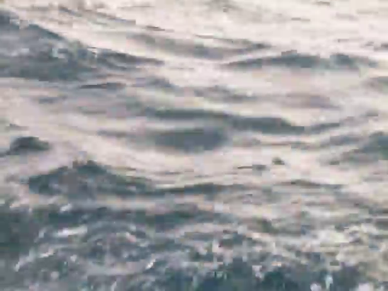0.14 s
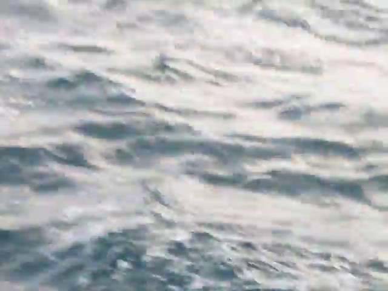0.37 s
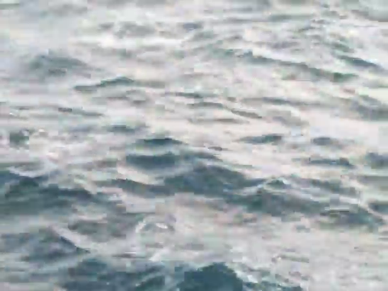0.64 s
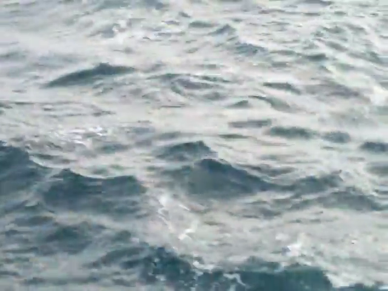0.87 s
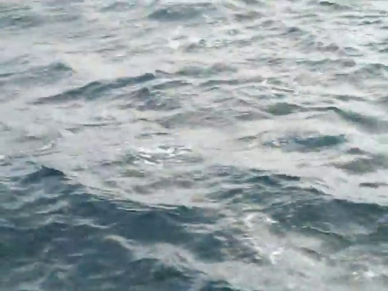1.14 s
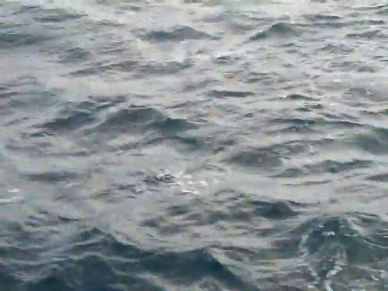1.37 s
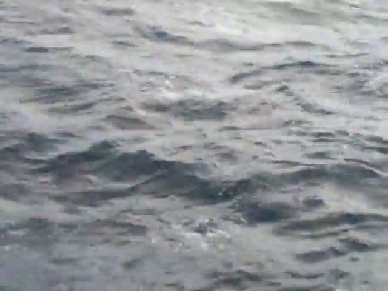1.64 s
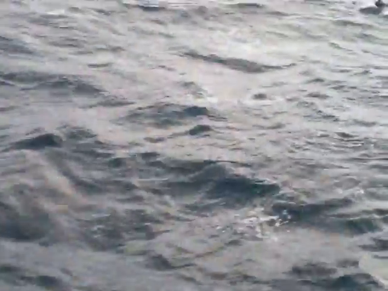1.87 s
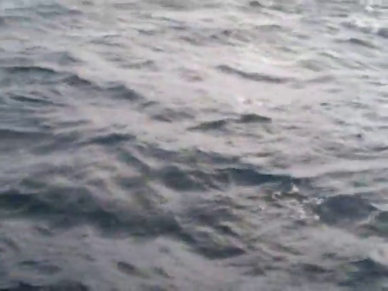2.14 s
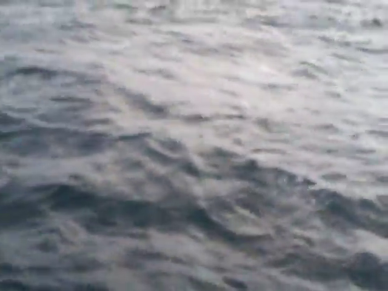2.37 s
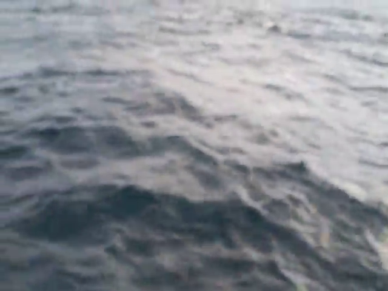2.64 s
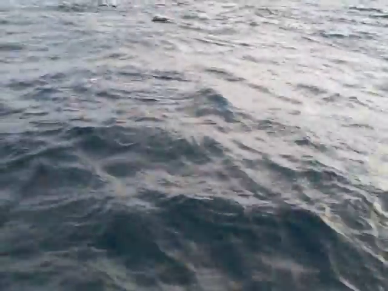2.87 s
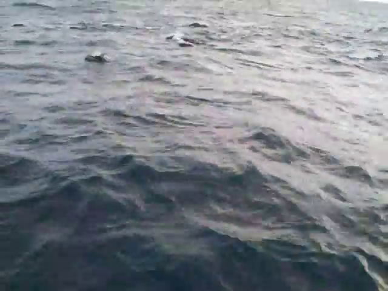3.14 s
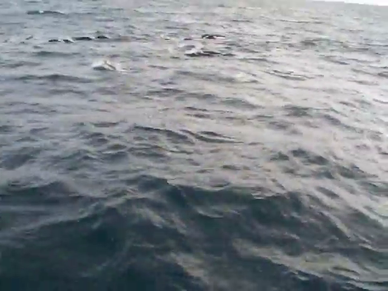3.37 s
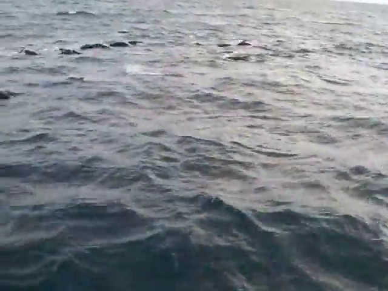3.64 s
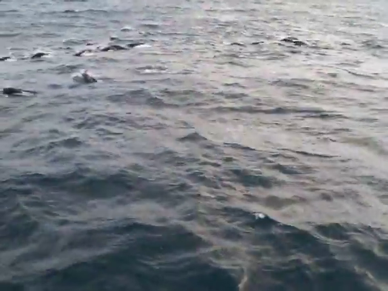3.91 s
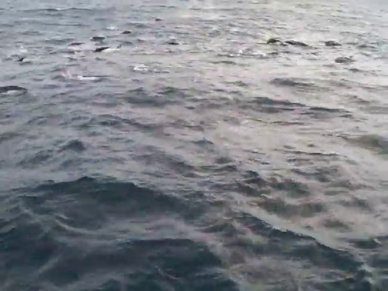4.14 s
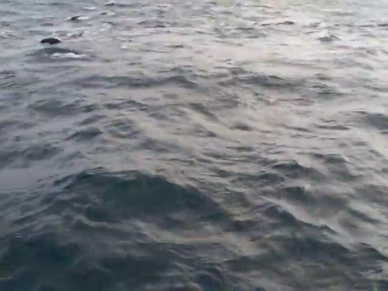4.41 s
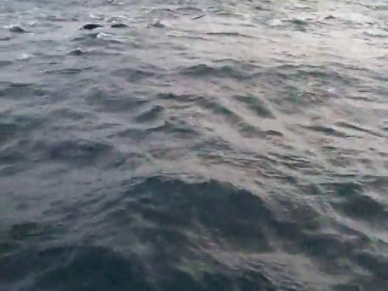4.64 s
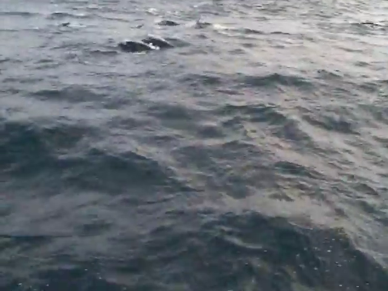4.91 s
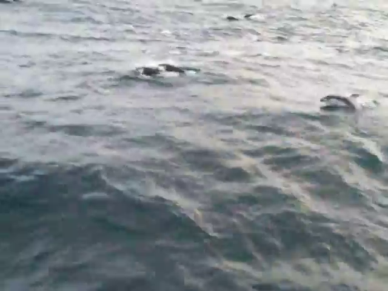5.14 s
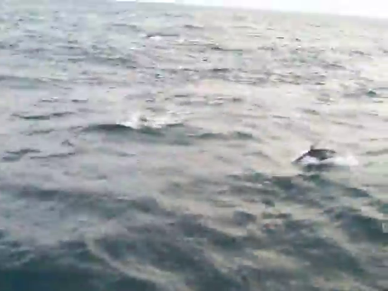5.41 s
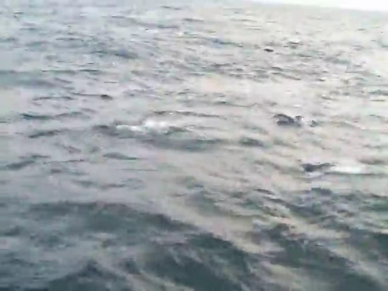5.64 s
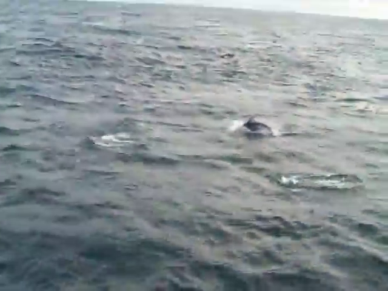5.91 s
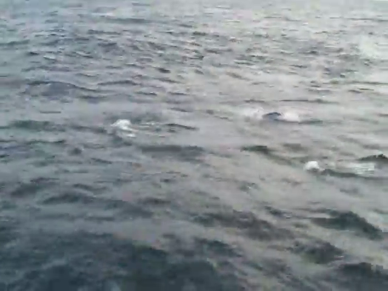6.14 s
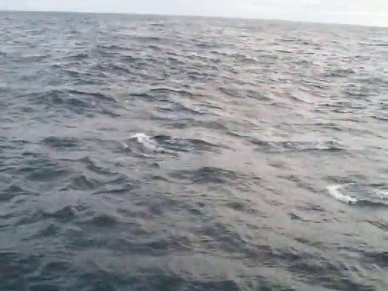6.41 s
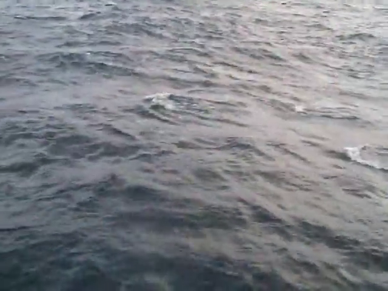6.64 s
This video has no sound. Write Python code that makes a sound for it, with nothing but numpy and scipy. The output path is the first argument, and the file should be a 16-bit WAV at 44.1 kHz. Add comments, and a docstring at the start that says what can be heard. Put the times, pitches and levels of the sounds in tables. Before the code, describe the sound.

About 0.2 s of silence, then the sound cuts in abruptly with a dull thump. A low engine drone with a noisy roar lies under fluttering wind rumble, close on a small, unshielded microphone on a boat deck. Until 0.8 s a thin, high lens motor whine buzzes in very fast steps, and the highs are muffled. At 0.9 s the sound opens: fizzing hull wash and smooth far-sea hiss, with a few wind pops. From 1.6 to 2.6 s it dulls again, with a fainter stepped whine from 1.7 to 2.5 s. Then it stays clear. A bright spray tick lands near 2.75 s, others around 4.05 and 4.4 s. From 3 s gust pops, knocks and crackles crowd in, densest around 5 to 5.3 s, while the wash surges, notably near 5.2 s. They thin near 6 s, then another cluster arrives around 6.5 s; wind, engines and water continue to the end.

```python
"""On the deck of a boat at sea: wind buffets the bare microphone of a small camera over the drone of engines.
After a short silence the sound cuts in with a thump, and the lens motor whines in quick steps until 0.8 s.
The camera dulls the middle and treble until 0.9 s, then hull wash and the far sea hiss clearly until 1.6 s.
The lens whines again from 1.7 to 2.5 s, and the sound is dull from 1.6 to 2.6 s; after that it stays clear.
Shaped noise makes wind, water and spray, sines make engines and lens; wind pops crowd in from 3 s on."""
import sys
import numpy as np
from scipy import signal
from scipy.fft import rfft, irfft, next_fast_len
from scipy.io import wavfile
from scipy.ndimage import uniform_filter1d

SR = 44100
rng = np.random.default_rng(int(sys.argv[2]) if len(sys.argv) > 2 else 0)


def volts_from_decibels(level):
    """Turn decibel levels (scalar or array-like) into linear amplitude factors."""
    exponent = np.asarray(level, float) / 20
    return 10 ** exponent


def unload_audio(sound):
    """Save the sound as a 16-bit wav file, at the path given as the first command line argument."""
    columns = np.transpose(np.atleast_2d(sound))
    # keep every value between -1 and 1, then stretch to whole-number steps
    steps = np.round(np.clip(columns, -1, 1) * 32767)
    wavfile.write(sys.argv[1], SR, steps.astype(np.int16))


N = 298768
T = np.arange(N) / SR  # time of every sample [s]


def unit(x):
    """Scale a sound so that its average strength (rms) is 1."""
    return x / np.sqrt(np.mean(x ** 2))


def shaped(x, gain):
    """Filter a sound by a gain given as a function of frequency."""
    size = next_fast_len(N)
    hz = np.fft.rfftfreq(size, 1 / SR) + 1  # the 1 avoids the logarithm of zero
    return irfft(rfft(x, size) * gain(hz), size)[:N]


def colour(points):
    """Noise of rms 1 that follows a (frequency, level) curve and fades quickly below its first point."""
    hz, db = np.transpose(points)

    def gain(f):
        curve_db = np.interp(np.log(f), np.log(hz), db)
        return volts_from_decibels(curve_db) * np.minimum(f / hz[0], 1) ** 4

    return unit(shaped(rng.standard_normal(N), gain))


def walk(rate):
    """A random wavering of rms 1: a new level `rate` times a second, smoothed twice."""
    hold = int(SR / rate)
    steps = np.repeat(rng.standard_normal(N // hold + 1), hold)
    smooth = uniform_filter1d(uniform_filter1d(steps, hold), hold)
    return unit(smooth[:N])


def add(out, at_s, grain):
    """Mix a short sound into a longer one at a given time."""
    i = int(at_s * SR)
    out[i:i + len(grain)] += grain[:max(N - i, 0)]


# gusts on top of the breeze: (start [s], length [s], buffet level [dB])
GUSTS = [(0.202, 0.023, -20), (0.768, 0.043, -21.5), (1.353, 0.029, -19.5), (1.431, 0.098, -27.5),
         (1.911, 0.032, -21), (2.62, 0.14, -25.5), (2.87, 0.053, -25.5), (2.989, 0.015, -24),
         (3.177, 0.1, -21), (3.371, 0.058, -25), (3.502, 0.25, -22.5), (3.87, 0.057, -28),
         (3.953, 0.025, -27.5), (4.274, 0.16, -28.5), (4.493, 0.023, -22.5), (4.715, 0.088, -19),
         (4.894, 0.15, -23.5), (5.089, 0.2, -22.5), (5.58, 0.016, -26), (5.661, 0.088, -25.5),
         (6.209, 0.027, -25), (6.429, 0.17, -22), (6.717, 0.15, -20)]


def gusts():
    """Power of the gusts: each rises quickly, holds, then dies away shortly."""
    rise_s, fall_s = 0.0088, 0.014
    power = 0
    for start_s, length_s, db in GUSTS:
        rise = np.clip((T - start_s) / rise_s, 0, 1)
        fall = np.exp(-np.clip(T - start_s - length_s, 0, None) / fall_s)
        power = power + volts_from_decibels(2 * db) * rise * fall
    return power


# the breeze between gusts: (time [s], rumble level [dB], buffet level [dB])
BREEZE = [(0.22, -18, -43.5), (0.401, -24, -30.5), (0.85, -23.5, -26), (1.16, -32, -26),
          (1.5, -20.5, -23.5), (1.769, -29, -27.5), (2.1, -25, -30.5), (2.9, -18, -23.5), (3.099, -26, -27),
          (3.601, -25, -26), (4.1, -28.5, -25.5), (4.7, -22, -25), (5.3, -27, -28), (5.5, -28, -27),
          (5.749, -28.5, -31.5), (6.1, -32, -29), (6.4, -28, -28), (6.77, -23.5, -24.5)]


def wind_strength():
    """Levels in dB of rumble and buffet: gust power adds to the breeze and lifts the rumble by half as many dB."""
    s, *columns = np.transpose(BREEZE)
    rumble_db, breeze_db = (np.interp(T, s, column) for column in columns)
    buffet_db = 10 * np.log10(volts_from_decibels(2 * breeze_db) + gusts())
    return rumble_db + 0.5 * (buffet_db - breeze_db), buffet_db


# the three parts of the wind, rumble, buffet and rasp: centre [Hz] and width [Hz] of each
WIND_AT_HZ = [50, 420, 1300]
WIND_WIDTH_HZ = [55, 460, 1000]


def wind(rumble_db, buffet_db, rasp_db, dulled):
    """Eddies on the membrane: noise bands half an octave apart share one quick flutter, the high ones most."""
    # less flutter while the sound is dulled
    flutter = unit(walk(60) + 1.8 * walk(170)) * np.where(dulled, 0.73, 1)
    levels = zip((rumble_db, buffet_db, rasp_db), WIND_WIDTH_HZ)
    per_hz = [db - 10 * np.log10(width) for db, width in levels]
    bend_at_hz = [22, 50, 150, 420, 750, 1300, 2000, 3600]
    bend_curve_db = [2.5, 3.0, 4.0, -3.5, -2.0, -8.5, -24.0, -19.0]
    out = 0
    for hz in 22 * 2 ** np.arange(0, 7.6, .5):
        band = unit(shaped(rng.standard_normal(N), lambda f: np.exp(-(np.log2(f / hz) / 0.43) ** 2)))
        # blend the levels of the two nearest parts of the wind
        place = np.interp(np.log(hz), np.log(WIND_AT_HZ), [0, 1, 2])
        low = min(int(place), 1)
        db = per_hz[low] + (place - low) * (per_hz[low + 1] - per_hz[low])
        bend_db = np.interp(np.log(hz), np.log(bend_at_hz), bend_curve_db)
        depth_db = np.interp(np.log(hz), np.log([40, 250, 1000]), [1.1, 3.1, 4.5])
        # a steady part under the jerks: the air never rests
        jerk = unit(0.17 + volts_from_decibels(depth_db * (flutter + 0.24 * walk(30))))
        # higher bands are wider, so they hold more sound
        out = out + band * jerk * volts_from_decibels(db + bend_db) * np.sqrt(0.27 * hz)
    return out


def flaps(rasp_db, dulled):
    """Small eddies slap the membrane in ragged clusters: pointed swings, mostly forward and weak, some strong."""
    t = np.arange(-300, 301) / SR
    cluster = volts_from_decibels(3.5 * walk(25))
    out = 0
    for width_s, db in [(.00025, 1.7), (.00045, 8.2), (.0009, 13)]:
        chance = rng.random((3, N))
        happens = chance[0] < 110 * cluster / SR
        direction = np.sign(chance[1] - .15)
        strength = volts_from_decibels(-3.5 * np.log(chance[2] + .02))
        slaps = happens * direction * strength
        shape = 1 / (1 + (t / width_s) ** 2) ** 2 - np.exp(-(t / (4 * width_s)) ** 2) / 5
        out = out + volts_from_decibels(db) * unit(signal.fftconvolve(slaps, shape, "same"))
    return out * volts_from_decibels(rasp_db - 8.0 * dulled)


# sudden gust pops on the membrane: (time [s], level [dB], extra level of the dull knock [dB])
POPS = [(0.9217, -24, 4), (1.2136, -29, 4), (1.2436, -28.5, -1), (1.3872, -22.5, 12.5), (1.4528, -20, -2),
        (1.479, -25.5, 7.5), (1.5127, -29.5, 9.5), (2.5691, -35, 16), (2.8838, -24.5, -8),
        (3.0046, -22, 8.5), (3.1818, -29.5, 0.5), (3.246, -22.5, 3.5), (3.3867, -26, 0.5),
        (3.4219, -20.5, 9), (3.4345, -26, 9), (3.492, -23.5, -6.5), (3.5399, -24.5, 10.5),
        (3.575, -31.5, 0.5), (3.6293, -24, 7), (3.7413, -30, 12.5), (3.7842, -21, -9.5),
        (3.827, -23.5, 6.5), (3.8775, -25.5, 7), (3.97, -29.5, 18.5), (4.0094, -19.5, 2.5),
        (4.163, -27.5, 16.5), (4.3298, -23, 0.5), (4.4781, -25, 4.5), (4.532, -26.5, 4), (4.647, -23.5, -2),
        (4.727, -27.5, 6.5), (4.776, -24.5, 3), (4.919, -23.5, -5.5), (4.935, -22.5, 5),
        (4.9767, -19.5, 9.5), (4.999, -18, -6.5), (5.0075, -22.5, -5), (5.0325, -29.5, 11.5),
        (5.051, -26.5, -9.5), (5.0936, -25.5, -2.5), (5.1112, -21, -7), (5.132, -24, 4), (5.15, -20, -1.5),
        (5.154, -26, 1), (5.182, -27, -8.5), (5.2406, -25, 3), (5.258, -22.5, 3.5), (5.272, -26, 0),
        (5.297, -32, 4), (5.323, -26, 2), (5.3353, -26, 3), (5.4693, -24.5, -3.5), (5.5819, -25.5, -2.5),
        (5.6032, -20.5, -15), (5.6102, -25.5, 5.5), (5.6219, -22, -0.5), (5.6671, -26.5, 6.5),
        (5.6816, -17.5, -9.5), (5.8319, -25.5, 11.5), (6.2296, -26, -8.5), (6.4415, -25, 5),
        (6.453, -23.5, 1.5), (6.5242, -19, -1.5), (6.5622, -20.5, -3), (6.592, -23, 11), (6.727, -22.5, -5)]


def pops():
    """Each pop draws the membrane aside in a dull knock and snaps it across, with a few ms of crackle."""
    pull_s, settle_s = 0.0014, .0008  # drawn back, then snapped forward to a point and dropped
    knock_s, crackle_s = 0.0005, 0.0017
    out, t = np.zeros(N), np.arange(int(-.008 * SR), int(.02 * SR)) / SR
    chance = rng.standard_normal((len(POPS), len(t)))
    crackle_band = signal.butter(3, [400, 1500], "band", fs=SR, output="sos")
    draw_aside = np.exp(-((t + knock_s) / knock_s) ** 2)
    swing_back = np.exp(-((t - 3 * knock_s) / (3 * knock_s)) ** 2) / 3
    knock = swing_back - draw_aside
    loudest_db = max(db for _, db, _ in POPS)
    for (s, db, knock_db), noise in zip(POPS, chance):
        crackle = unit(signal.sosfilt(crackle_band, noise)) * np.exp(-np.abs(t) / crackle_s)
        # weaker pops snap more slowly
        snap_s = 0.00013 * volts_from_decibels(0.47 * (loudest_db - db))
        swing = np.tanh(t / snap_s) * np.exp(-np.abs(t) / np.where(t < 0, pull_s, settle_s))
        push = volts_from_decibels(12) * swing + volts_from_decibels(5 + knock_db) * knock
        add(out, s + .001 + t[0], volts_from_decibels(db) * (push + volts_from_decibels(-4) * crackle))
    return out


# exhaust and shaft tones: (frequency [Hz], level before the loudness changes [dB])
DRONE = [(45.5, -35), (90.9, -26.5), (111.4, -22), (167, -33.5), (206, -38), (223, -38.5)]
# the drone's loudness changes in steps and slow swells; only the rise and fall counts: (time [s], level [dB])
DRONE_LEVEL = [(0.21, -19), (0.83, -20), (0.9, -23), (2.35, -22), (2.46, -26), (4.26, -25), (4.41, -19.5),
               (4.7, -28.5), (4.95, -24), (5.3, -27), (6.77, -24)]
# tone colour of the engine-room roar: (frequency [Hz], level in each Hz [dB])
ROAR = [(150, 6), (300, -4), (600, 1), (800, -12.5), (1100, -27.5), (1600, -46.5)]


def engines():
    """Steady tones whose pitch and strength waver a little, over an even noisy roar."""
    s, level_db = np.transpose(DRONE_LEVEL)
    speed = 1 + 0.0026 * walk(2.518)
    tones = 0
    for hz, db in DRONE:
        turns = np.cumsum(hz * speed * (1 + 0.0015 * walk(6))) / SR + rng.random()
        tones = tones + volts_from_decibels(db + 1.5 * walk(5)) * np.sin(2 * np.pi * turns)
    roar = colour(ROAR) * volts_from_decibels(-39 + 3.4 * walk(90))
    loudness = volts_from_decibels(np.interp(T, s, level_db) - np.mean(level_db))
    return (np.sqrt(2) * tones + roar) * loudness


# the two runs of the lens motor, each: (time [s], pitch of the third overtone [Hz], level [dB])
LENS = [
    [(.22, 3470, -43), (.3, 3455, -46), (.55, 3410, -45), (.795, 3390, -43.5)],
    [(1.685, 3325, -50), (1.8, 3365, -46.5), (2.0, 3395, -47), (2.1, 3410, -50), (2.51, 3420, -54)],
]
# first step of each run: (time [s])
LENS_FIRST_STEP_S = [.2218, 1.688]
# overtones of the whine: (multiple of the coil pitch, level [dB])
LENS_TONES = [(2, -12), (3, 0), (4, -10), (6, -13)]
LENS_STEPS_PER_S = 37.4


def lens():
    """A stepping motor: overtones of its coil whine, strong in the first part of every step."""
    out = 0
    for run, first_s in zip(LENS, LENS_FIRST_STEP_S):
        s, hz, db = np.transpose(run)
        turn = np.cumsum(np.interp(T, s, hz) / 3 * (1 + .001 * walk(150))) / SR
        step = (T - first_s) * LENS_STEPS_PER_S % 1
        pulse = .15 + (step < .35) * np.exp(-step / .9)
        running = (T > first_s) * (T < s[-1])
        gate = uniform_filter1d(pulse * running, size=110)
        whine = sum(volts_from_decibels(d) * np.sin(2 * np.pi * round(k) * turn) for k, d in LENS_TONES)
        out = out + whine * gate * volts_from_decibels(np.interp(T, s, db) + .6 * walk(37))
    return out


# drops of spray that hit near the microphone: (time [s], level [dB], centre [Hz], width [octaves])
SPRAY = [(0.4085, -29, 3560, 1.8), (0.658, -31, 3650, 1.7), (0.946, -23.5, 5100, 0.77),
         (1.875, -34.5, 4470, 1.5), (1.93, -36.5, 3530, 1.9), (2.332, -31, 3520, 2.2),
         (2.5528, -32, 5060, 0.99), (2.7525, -18.5, 6000, 0.73), (4.05, -19.5, 2570, 0.84),
         (4.383, -33.5, 5740, 1), (4.4118, -22.5, 5700, 0.49), (4.419, -25.5, 6130, 0.99),
         (4.432, -31, 5780, 0.92), (6.179, -36, 6570, 0.73)]


def spray():
    """A drop bursts: a few ms of bright noise around its own centre frequency."""
    out, u = np.zeros(N), np.arange(int(0.049 * SR)) / SR
    noise = rng.standard_normal((len(SPRAY), len(u)))
    burst = np.minimum(u / 0.00072, 1) * np.exp(-u / 0.0019)
    for (s, db, hz, octaves), hiss in zip(SPRAY, noise):
        edges_hz = [hz / 2 ** (octaves / 2), hz * 2 ** (octaves / 2)]
        band = signal.butter(2, edges_hz, "band", fs=SR, output="sos")
        add(out, s - .001, volts_from_decibels(db - 2.5) * unit(signal.sosfilt(band, hiss)) * burst)
    return out


# wash surging with the waves while the sound is clear: (time [s], level before a fixed lift [dB])
WASH = [(0.9, -50.5), (1.41, -43), (1.63, -47.5), (2.62, -51), (2.93, -42.5), (3.06, -52.5), (3.55, -48.5),
        (3.87, -45), (4.05, -56), (4.3, -45.5), (4.5, -52), (5.1, -50), (5.24, -38.5), (5.43, -49),
        (5.59, -46), (5.95, -57), (6.5, -42.5), (6.77, -46)]


def wash_level(dulled, hush_db):
    """Level of the wash in dB: it surges while the sound is clear and stays low while it is dulled."""
    return np.where(dulled, -59 + hush_db, np.interp(T, *np.transpose(WASH)))


# tone colour of the wash, clear and dulled: (frequency [Hz], level in each Hz [dB])
SEA_OPEN = [(900, -5.5), (1700, -1.5), (2300, -2), (3200, -4), (5000, -2.5), (7200, -3.5), (8200, -11.5),
            (9000, -29)]
SEA_DULLED = [(900, -8), (1500, -10), (2300, -6.5), (3200, -4), (5000, -7), (7200, -6.5), (8200, -11),
              (9000, -43)]


def hull_wash(hiss_db, dulled, push):
    """Hiss along the hull, fizzing with tiny bubbles; when dulled it follows the big swings of the membrane."""
    fizz = unit(volts_from_decibels(0.9 * walk(60) + 0.97 * walk(500)))
    ride = unit(.9 + uniform_filter1d(np.abs(push), size=60) ** 1.4)
    # in the second dulled stretch the hiss throbs at the pace of the lens steps
    steps = np.cos(2 * np.pi * (T - LENS_FIRST_STEP_S[1]) * LENS_STEPS_PER_S)
    throb = volts_from_decibels(1.3 * steps * (T > SWITCH_S[1]))
    dull_wash = colour(SEA_DULLED) * throb * ride * volts_from_decibels(8.0)
    clear_wash = colour(SEA_OPEN) * volts_from_decibels(3.0)
    return np.where(dulled, dull_wash, clear_wash) * fizz * volts_from_decibels(hiss_db)


# tone colour of the open sea: (frequency [Hz], level in each Hz [dB])
FAR_SEA = [(1000, -10), (1450, -2), (1850, -6), (2250, -2), (2750, -5.5), (3100, -11.5), (5000, -32.5)]
# loudness of the open sea: (time [s], level [dB])
FAR_SEA_LEVEL = [(.9, -46.5), (1.63, -47), (2.72, -44.5), (3.0, -49.5), (6.77, -51.5)]


def far_sea(dulled):
    """Countless distant wavelets: a smooth hiss, lost while the treble is dulled."""
    level_db = np.interp(T, *np.transpose(FAR_SEA_LEVEL)) + 1.0 * walk(7.3)
    return colour(FAR_SEA) * volts_from_decibels(level_db) * ~dulled


# the sound is dulled at first; at each of these it turns clear or dull in turn: (time [s])
SWITCH_S = [.906, 1.625, 2.624]


def dulling():
    """When the camera dulls the sound, and the further 3 dB drop from each lens stop until it clears."""
    dulled = np.searchsorted(SWITCH_S, T) % 2 == 0
    lens_stopped = sum((T > run[-1][0]) * (T < end) for run, end in zip(LENS, SWITCH_S[::2]))
    return dulled, -3 * dulled * lens_stopped


def scene():
    """Wind, engines, lens motor, spray and sea at one microphone."""
    rumble_db, buffet_db = wind_strength()
    dulled, hush_db = dulling()
    # the rasp grows faster than the buffet
    rasp_db = -45 + 1.45 * (buffet_db + 25) - 7.5 * dulled + hush_db
    low = wind(rumble_db, buffet_db, rasp_db, dulled) + flaps(rasp_db, dulled) + pops() + engines()
    wash = hull_wash(wash_level(dulled, hush_db), dulled, unit(low))
    return (low + lens() + spray() + wash + far_sea(dulled))[None]


def top_cut(x):
    """Nothing passes above the cut-off."""
    return signal.sosfilt(signal.butter(12, 8920, fs=SR, output="sos"), x)


def record(dry):
    """The sound cuts in abruptly with a thump; the loudest swings are rounded, the top falls away above 8 kHz."""
    start_s, thump_s, rise_s = .2082, .0046, .0001
    # one smooth downward bump makes the thump of the abrupt start
    thump = -1.1 * np.exp(-((T - start_s - thump_s / 2) / (.5 * thump_s)) ** 2)
    fade_in = np.clip((T - start_s) / thump_s, 0, 1) ** 2
    rounded = np.tanh(dry * fade_in + thump) / 1.11
    mix = rounded * np.clip((T - start_s) / rise_s, 0, 1)
    mix = signal.sosfilt(signal.butter(8, 8250, fs=SR, output="sos"), mix)
    mix = signal.sosfilt(signal.ellip(8, .2, 60, 8800, fs=SR, output="sos"), mix)
    return top_cut(mix)


dry = scene()
out = record(dry)
unload_audio(out)
```